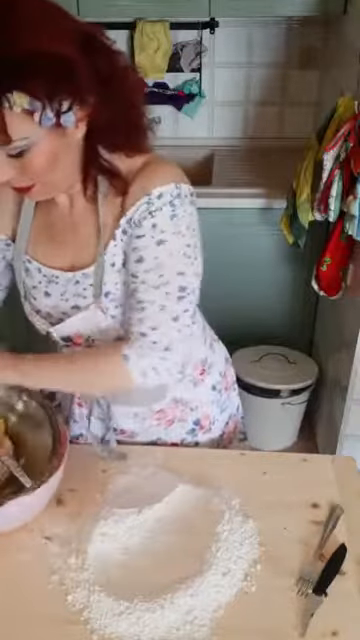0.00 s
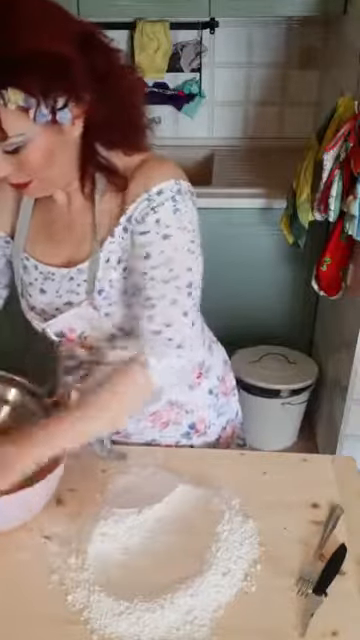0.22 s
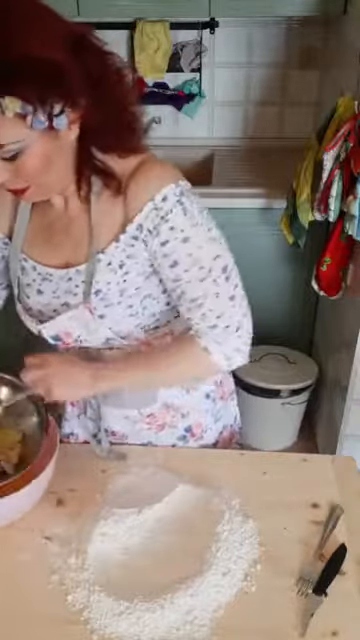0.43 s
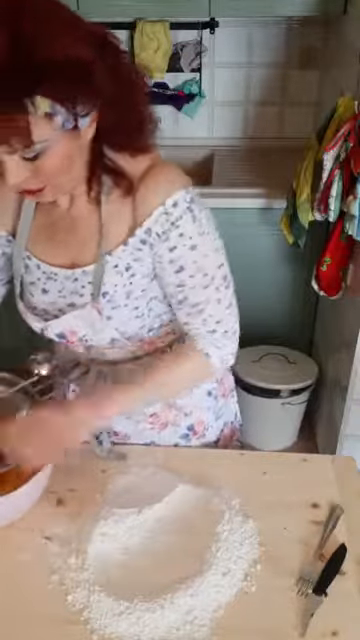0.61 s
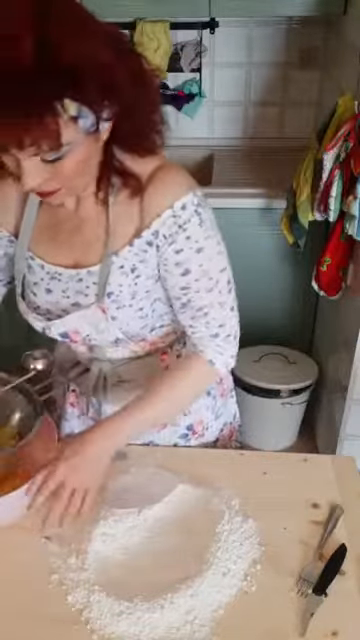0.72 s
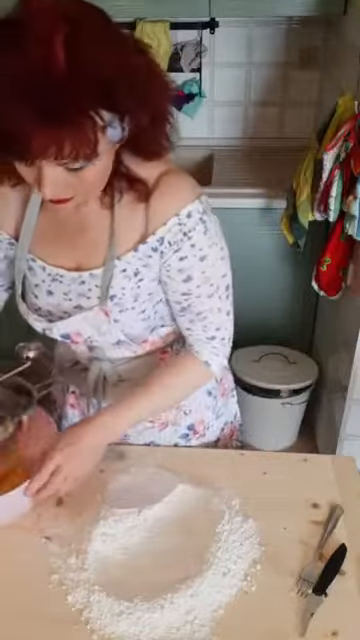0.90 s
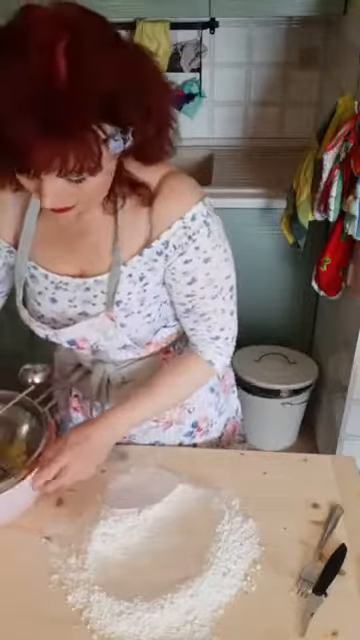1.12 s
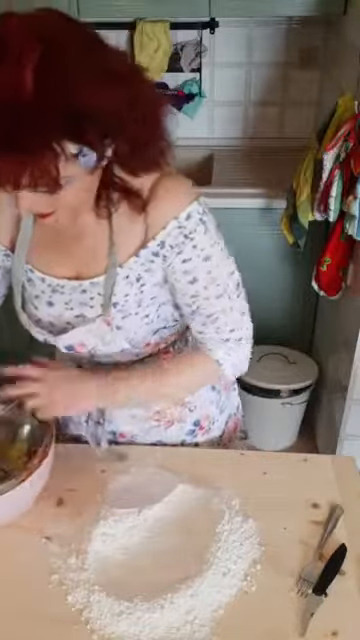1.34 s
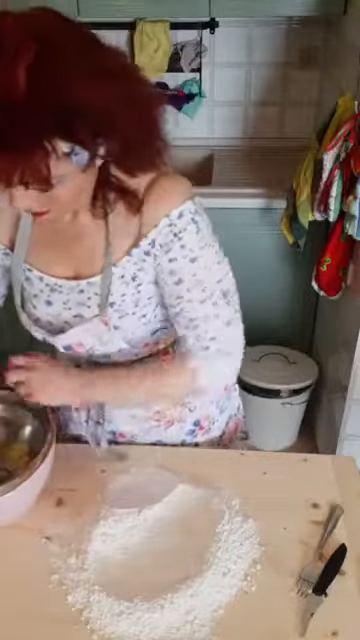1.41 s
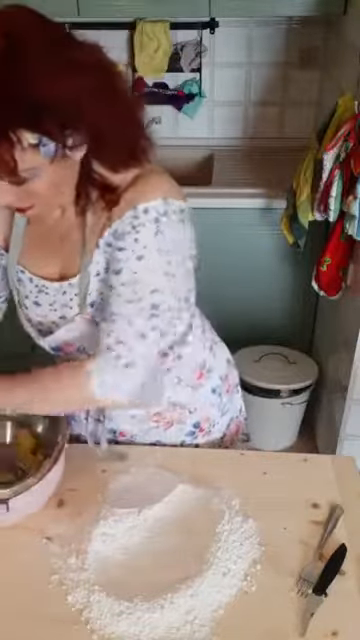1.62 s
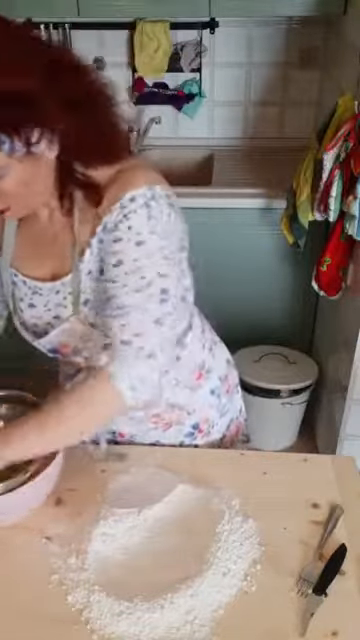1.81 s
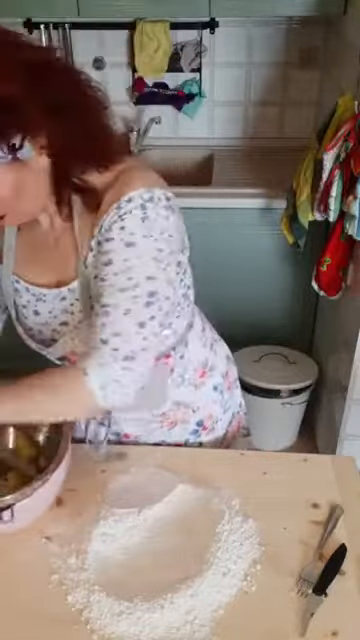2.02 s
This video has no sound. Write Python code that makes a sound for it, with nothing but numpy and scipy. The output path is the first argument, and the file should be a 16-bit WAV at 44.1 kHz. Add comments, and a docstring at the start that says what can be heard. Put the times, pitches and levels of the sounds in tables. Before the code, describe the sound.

Two rough strokes of a metal food mill, first longer with ticks, rasping and a loud hollow bowl knock, then a clattering knock and a brief scrape, heard close, slightly to the right, with short kitchen reverberation.

```python
"""A steel hand mill in a mixing bowl on a wooden board drags and scrapes through two rough strokes.
Tiny slips rub the modes of bowl, steel and table; knocks and ticks strike them; the bare contact hisses.
A tiled kitchen rings on in sparse decaying echoes. The mill stands to one side of a phone with two ports,
whose body shades the far one. Beneath lie a low sway of the table and the noise of room and microphone."""
import sys
import numpy as np
from scipy import signal
from scipy.fft import rfft, irfft, next_fast_len
from scipy.io import wavfile
from scipy.ndimage import uniform_filter1d

SR = 44100
rng = np.random.default_rng(int(sys.argv[2]) if len(sys.argv) > 2 else 0)


def unload_wav(signal):
    """Save mono or channel-first audio to the path in sys.argv[1] as 16-bit WAV at rate SR, clipped to [-1, 1]."""
    wavfile.write(
        sys.argv[1],
        SR,
        np.round(np.clip(np.atleast_2d(signal).T, -1, 1) * 32767).astype(np.int16),
    )


def convert_level_to_amplitude(level_db):
    """Map a level in decibels to its linear amplitude factor."""
    exponent = np.asarray(level_db, float) / 20
    return 10 ** exponent


N = 92610


def evened(x):
    """Normalisation: scales a signal to an rms of one."""
    return x / np.sqrt(np.mean(x ** 2) + 1e-20)


def read(points, hz):
    """Interpolation of a spectral curve along a logarithmic frequency axis."""
    f, value = np.transpose(points)
    return np.interp(np.log(hz + 1), np.log(f + 1), value)


def shaped(x, gain):
    """Linear filtering: multiplies the spectrum by gain(Hz)."""
    size = next_fast_len(N + 4096)
    hz = np.arange(size // 2 + 1) * SR / size
    return irfft(rfft(x, size) * gain(hz), size)[..., :N]


def taps(rows, order):
    """Impulsive excitation: one impulse for each row, as strong as column `order` says in dB."""
    out, rows = np.zeros(N), np.array(rows)
    at = np.round(rows[:, 0] * SR).astype(int)
    np.add.at(out, at, convert_level_to_amplitude(rows[:, order]))
    return out


# Likeness of the two ports. Each row: frequency in Hz, left-right correlation from -1 to 1.
LIKENESS = [(60, 1), (250, 0.79), (500, 0.73), (1000, 0), (2000, 0), (8000, 0)]


def pair(a, b):
    """Partial coherence: a common and an opposed part set the likeness of two ports at each frequency."""
    same = lambda hz: np.clip(read(LIKENESS, hz), -1, 1)
    mid = shaped(a, lambda hz: np.sqrt((1 + same(hz)) / 2))
    side = shaped(b, lambda hz: np.sqrt((1 - same(hz)) / 2))
    return np.array([mid + side, mid - side])


# Colour of the background noise. Each row: frequency in Hz, relative density in dB per Hz.
AIR_COLOUR = [(15, -31), (25, 2.5), (277, -5.5), (363, -9.5), (516, -6), (886, -8), (1400, 0), (2680, -13),
              (5000, -11), (7490, -25), (16000, -17)]
AIR_DB = -63.5  # rms


def air():
    """Stationary noise: the quiet of the room and the microphone's own hiss as coloured Gaussian noise."""
    noise = shaped(rng.standard_normal((2, N)), lambda hz: convert_level_to_amplitude(read(AIR_COLOUR, hz)))
    return convert_level_to_amplitude(AIR_DB) * evened(pair(*noise))


SWAY_HZ, SWAY_RISE_S, SWAY_T60_S = 40, 0.019, 0.31
# Shoves that set the table swaying on its legs. Each row: start in seconds, peak level in dB.
SWAYS = [(.29, -54), (.40, -58), (.47, -55), (.60, -43), (.66, -43), (1.2, -57), (1.33, -51), (1.73, -56),
         (1.9, -56)]


def sway():
    """Damped oscillation: a low swing builds up and decays after each shove."""
    t = np.arange(SR // 2) / SR
    envelope = (1 - np.exp(-t / SWAY_RISE_S)) * convert_level_to_amplitude(-60 * t / SWAY_T60_S)
    swing = envelope * np.sin(2 * np.pi * SWAY_HZ * t)
    return signal.oaconvolve(taps(SWAYS, order=1), swing / abs(swing).max())[:N]


FIRST_ECHO_S, ECHO_STEP = .008, 12  # the step in samples
# Reverberation of the room. Each row: frequency in Hz, time to fall by 60 dB in seconds.
ROOM_DECAY = [(100, 0.53), (260, 0.25), (700, 0.52), (1840, 0.42), (4850, 0.52), (12800, 0.31)]


def kitchen(x):
    """Reverberation: sparse echoes of random sign, each band dying at its own speed."""
    echoes, first = np.zeros((2, SR)), round(FIRST_ECHO_S * SR)
    at = np.arange(first, SR - 20, ECHO_STEP)
    at = at + rng.integers(0, ECHO_STEP, (2, len(at)))
    np.put_along_axis(echoes, at, rng.choice([-1., 1.], at.shape), 1)
    hz, t, bands = signal.stft(echoes, SR, nperseg=256)
    decay = convert_level_to_amplitude(-60 * t / read(ROOM_DECAY, hz)[:, None])
    tail = signal.istft(bands * decay, SR, nperseg=256)[1]
    tail[:, :first] = 0
    tail = tail / np.linalg.norm(tail[0])
    return pair(*signal.fftconvolve(x[None], tail, axes=1)[:, :N])


NEAR_S, NEAR_FROM_HZ = .016, 2000


def near(x):
    """Early scattering: board, wall and bowl rim return the treble soon, differently to each port."""
    echoes = np.zeros((2, SR // 10))
    when, sign = rng.random((2, 2, 64))
    at = 10 + (when ** 2 * NEAR_S * SR).astype(int)  # denser toward the start
    np.put_along_axis(echoes, at, np.sign(sign - .5) / 8, 1)
    scattered = signal.oaconvolve(x[None], echoes, axes=1)[:, :N]
    return shaped(scattered, lambda hz: hz ** 2 / (hz ** 2 + NEAR_FROM_HZ ** 2))


ROOM_DB, NEAR_DB = -1, 4.5
SHIFT_S = 0.4487  # the mill shifts its place this slowly


def reflections(dry):
    """Moving source: the sound glides among three places, each with echoes of its own."""
    turn = np.pi * np.arange(N) / SR / SHIFT_S
    # the squares of the three weights always add up to one
    places = [dry * np.sqrt(2 / 3) * np.cos(turn + k * np.pi / 3) for k in range(3)]
    return sum(convert_level_to_amplitude(ROOM_DB) * kitchen(x) + convert_level_to_amplitude(NEAR_DB) * near(x) for x in places)


LEFT_LAG_S = .0001
SHADE_HZ = 1590  # above this the far port hears the mill chiefly by reflection
# The mill's side. Each row: frequency in Hz, left minus right in dB.
TILT = [(60, 2.5), (110, -2), (200, 0), (380, -0.5), (700, 0.5), (1290, 1), (2380, 1), (4400, 0.5),
        (8120, -10.5), (15000, -8)]


def at_ports(dry):
    """Diffraction: direct sound reaches the far left port late and dulled; both ports add reflections."""
    shade = lambda hz: np.exp(-2j * np.pi * hz * LEFT_LAG_S) / (1 + (hz / SHADE_HZ) ** 2)
    wet = reflections(dry)
    left = shaped(dry, shade) + wet[0]
    right = dry + wet[1]
    return np.array([shaped(left, lambda hz: convert_level_to_amplitude(read(TILT, hz) / 2)),
                     shaped(right, lambda hz: convert_level_to_amplitude(-read(TILT, hz) / 2))])


# The strokes, a list of rows for each. Each row: time in seconds, drive of the bowl in dB,
# drive of the steel in dB, hiss of the contact in dB, rumble of the table in dB.
STROKES = [
    [(0, -42.5, -42.5, -53, -78), (.08, -56.5, -82, -48.5, -61.5), (.15, -38.5, -45, -43.5, -86),
     (.21, -39, -54, -39, -84), (.27, -31.5, -39, -38, -45), (.34, -35, -40.5, -30, -78),
     (.385, -28.5, -31, -50, -56), (.42, -26, -44, -57, -61), (.49, -38.5, -78.5, -42, -74.5),
     (.56, -47, -47, -60, -57), (.61, -32.5, -53, -52, -49), (.645, -39.5, -63, -48.5, -55),
     (.7, -63, -75, -62, -74), (.8, -93, -100, -87, -73)],
    [(1.2, -21, -28.5, -39.5, -50), (1.24, -29.5, -44.5, -38, -58), (1.29, -31, -45, -65, -54),
     (1.36, -52.5, -60, -54.5, -57), (1.44, -45.5, -74, -77, -89), (1.48, -48.5, -63.5, -68, -82),
     (1.56, -53.5, -56, -66, -64), (1.6, -48.5, -50, -56, -60.5), (1.665, -40, -46, -58, -66),
     (1.68, -41.5, -33.5, -38.5, -72), (1.72, -39, -51, -38.5, -84), (1.77, -37, -52.5, -38.5, -77),
     (1.85, -36.5, -59, -49, -57), (1.92, -48.5, -65, -63, -70), (1.97, -57.5, -78, -74, -58),
     (2.03, -54.5, -86.5, -66, -85), (2.1, -66, -74, -65, -83)],
]


def drive(order):
    """Amplitude envelope: gain of one stroke column over time, straight in dB between rows."""
    t, gain = np.arange(N) / SR, 0
    for stroke in STROKES:
        rows = np.array(stroke)
        gain = gain + convert_level_to_amplitude(np.interp(t, rows[:, 0], rows[:, order], left=-120, right=-120))
    return gain


GRAINS_PER_S, GRAIN_SPREAD_DB, CLUMP_DB, CLUMP_S = 2500, 5, 2, 0.0053


def grit():
    """Stick-slip friction: dense tiny slips of uneven size that come in clumps, at an rms of one."""
    clumps = evened(uniform_filter1d(rng.standard_normal(N), round(CLUMP_S * SR)))
    size = convert_level_to_amplitude(GRAIN_SPREAD_DB * np.minimum(rng.exponential(1, N), 4) + CLUMP_DB * clumps)
    slips = rng.random(N) < GRAINS_PER_S / SR
    return evened(size * rng.choice([-1., 1.], N) * slips)


def ringing(modes):
    """Modal impulse response: decaying sines; a body radiates little below its lowest mode."""
    t = np.arange(SR // 3) / SR
    ring = sum(convert_level_to_amplitude(db - 60 * t / t60) * np.sin(2 * np.pi * hz * t) for hz, db, t60 in modes)
    return signal.sosfilt(signal.butter(4, .85 * modes[0][0], "high", fs=SR, output="sos"), ring)


SPOTS = 5
SPOT_DETUNE, SPOT_DB = 0.029, 2.5  # each spot shifts and weighs the modes by up to this
RUB_DAMPING = 0.61  # rubbing shortens the decay times by this factor


def rubbed(modes, slips):
    """Position-dependent excitation: every slip lands on one of a few spots with modes of its own."""
    spot = rng.integers(0, SPOTS, N)
    draw = rng.uniform(-0.81, 1, (SPOTS, len(modes), 2))
    out = np.zeros(N)
    for k in range(SPOTS):
        ring = ringing([(hz * (1 + SPOT_DETUNE * a), db + SPOT_DB * b, t60 * RUB_DAMPING)
                        for (hz, db, t60), (a, b) in zip(modes, draw[k])])
        out += signal.oaconvolve(slips * (spot == k), ring / np.linalg.norm(ring))[:N]
    return out


def body(modes, slips, blows):
    """Superposition: a body rubbed by slips (rms level) and struck by blows (peak level)."""
    ring = ringing(modes)
    return rubbed(modes, slips) + signal.oaconvolve(blows / abs(ring).max(), ring)[:N]


TABLE_KNOCK_DB = -31.5  # below the belly of the bowl
# Modes of the table. Each row: frequency in Hz, relative level in dB, struck 60 dB decay in seconds.
TABLE = [(61.6, -10, 0.19), (81.6, -6, 0.11), (100, 8, 0.14), (114, 7.5, 0.2875), (158, 0, 0.076)]
# Knocks of the bowl on the board. Each row: start in seconds, peak of the belly in dB, peak of the rim in dB,
# peak of the steel in dB, strength of the snap in dB.
KNOCKS = [(0.399, -17, -22, -30, -39), (0.4013, -8, -7, -30, -33), (.410, -21.5, -24, -40, -44.5),
          (.416, -15.5, -28, -17, -42), (.423, -15.5, -32, -33, -42), (.454, -22.5, -35, -45, -48.5),
          (.607, -25, -55, -49, -58), (1.195, -29, -26, -40, -15), (1.199, -23, -29.5, -42, -32),
          (1.208, -17, -15.5, -26.5, -30), (1.211, -14.5, -42, -44, -33), (1.217, -15, -14, -42, -37),
          (1.230, -14.5, -15, -49, -46), (1.484, -48, -33.5, -47, -58), (1.498, -62, -41, -57, -55),
          (1.737, -25, -27, -51, -43), (1.763, -20, -41, -45, -51), (1.79, -27, -50, -43, -52),
          (1.84, -25, -32, -58, -52), (1.859, -30.5, -44, -51, -48)]


def table():
    """Structure-borne sound: strokes and knocks pass into the modes of the table."""
    return body(TABLE, drive(order=4) * grit(), convert_level_to_amplitude(TABLE_KNOCK_DB) * taps(KNOCKS, order=1))


BITE_S = .0015  # time constant of the onset


def puffs(blows, length_s, gain):
    """Transient noise: short bursts of one colour with exponential rise and decay."""
    t = np.arange(2000) / SR
    burst = (1 - np.exp(-t / BITE_S)) * np.exp(-t / length_s)
    envelope = signal.oaconvolve(blows, burst)[:N]
    return shaped(envelope * rng.standard_normal(N), gain)


SNAP_S, SIZZLE_S, SIZZLE_HZ = 0.0015, 0.0027, (10500, 15360)  # decay constants; edges of the sizzle
# Colour of the bare contact. Each row: frequency in Hz, relative density in dB per Hz.
CONTACT_COLOUR = [(530, -21.5), (900, 2.5), (979, -8), (2040, -4.5), (2440, -3), (7850, -22.5),
                  (9750, -30.5), (14500, -24.5), (16000, -39.5)]
# Ticks of steel on steel. Each row: start in seconds, peak of the steel in dB, strength of the snap in dB,
# strength of the sizzle in dB, peak of belly and of rim in dB, brightest frequency in Hz.
TICKS = [(.064, -34, -29, -55, -37.5, 2600), (.092, -27, -41, -55, -38, 2600),
         (.0955, -18.5, -21, -50, -31, 2750), (.128, -32, -38, -54, -34.5, 2090),
         (0.156, -45, -46, -42, -43, 2300), (.224, -28, -45, -25.5, -41, 2950),
         (0.2303, -19, -17.5, -37, -25, 2700), (0.2753, -22, -12, -29, -24, 2100),
         (.329, -21, -11, -28, -38, 3170), (.504, -25, -24.5, -35, -49, 2160),
         (.623, -22.5, -40, -60, -28.5, 2450), (.638, -30.5, -46, -61, -33.5, 2450),
         (1.581, -31, -55, -44, -70, 3060), (1.670, -23.5, -30, -34, -45, 3080),
         (1.674, -13.5, -29, -41, -31, 3080), (1.682, -26, -16, -48, -47, 2300),
         (1.691, -30, -44, -52, -52, 2800), (1.721, -25, -41, -52, -37, 2720)]


def contact():
    """Contact noise: rubbing surfaces hiss in strokes, snap at knocks and ticks, and sizzle at ticks."""
    unit = np.sqrt(np.mean(convert_level_to_amplitude(2 * read(CONTACT_COLOUR, np.linspace(0, SR / 2, 999)))))
    colour = lambda hz: convert_level_to_amplitude(read(CONTACT_COLOUR, hz)) / unit
    low, high = SIZZLE_HZ
    top = lambda hz: 1 / (1 + (low / (hz + 1)) ** 10) / (1 + (hz / high) ** 20)
    hiss = shaped(drive(order=3) * evened(grit() + rng.standard_normal(N)), colour)
    snap = puffs(taps(KNOCKS, order=4) + taps(TICKS, order=2), SNAP_S, colour)
    sizzle = puffs(taps(TICKS, order=3), SIZZLE_S, top)
    return hiss + snap + sizzle


TICK_OCTAVES = 0.36  # modes this far from the brightest pitch are 6 dB weaker
KNOCK_HZ, TICK_RISE_S = 2300, 0.0004  # brightest pitch of the steel in a knock; time constant of the onset
# Modes of the steel parts. Each row: frequency in Hz, relative level in dB, struck 60 dB decay in seconds.
STEEL = [(1817, -8, 0.013), (2054, 0, 0.026), (2213, 6.5, 0.018), (2450, 0.5, .025), (2613, 2, 0.024),
         (2790, -4.5, 0.015), (2995, -0.5, 0.018), (3148, -3.5, 0.03), (3410, -8.5, 0.015),
         (3736, -3, 0.011), (4165, -3, 0.022), (4600, -4.5, 0.0076), (4820, -3, 0.018), (5340, -18.5, 0.02),
         (6800, -29, 0.0068), (8200, -27.5, 0.012)]


def struck_steel():
    """Selective modal excitation: each blow rings chiefly the modes near its brightest pitch."""
    out = np.zeros(N + SR)
    blows = [(r[0], r[1], r[5]) for r in TICKS] + [(r[0], r[3], KNOCK_HZ) for r in KNOCKS]
    for s, peak_db, top_hz in blows:
        ring = ringing([(hz, db - 6 * (np.log2(hz / top_hz) / TICK_OCTAVES) ** 2, t60)
                        for hz, db, t60 in STEEL])
        ring *= 1 - np.exp(-np.arange(len(ring)) / SR / TICK_RISE_S)
        out[round(s * SR):][:len(ring)] += convert_level_to_amplitude(peak_db) * ring / abs(ring).max()
    return out[:N]


def steel():
    """Modal vibration: the steel parts ring from the slips of the strokes and from ticks and knocks."""
    return rubbed(STEEL, drive(order=2) * grit()) + struck_steel()


RIM_DRAG_DB = -7.5  # drag of the rim below that of the belly
# Modes of the bowl's belly, then of its rim.
# Each row: frequency in Hz, relative level in dB, struck 60 dB decay in seconds.
BELLY = [(207.6, -22.5, 0.098), (277, -26.5, 0.034), (307, -22.5, 0.035), (385, -3.5, 0.11),
         (413.3, -6.5, 0.12), (458, 7, 0.078), (504.5, 10, 0.079), (551, 0, 0.1), (597, 3.5, 0.039),
         (699.4, -1.5, 0.075), (767, -11.5, 0.047)]
RIM = [(855, -9.5, .03), (1002, -9.5, 0.028), (1080, -3, 0.027), (1202, 0.5, 0.022), (1405, 7, 0.012),
       (1503, 1, 0.031), (1643, -6.5, 0.0083)]


def bowl():
    """Shell vibration: slips, knocks and ticks ring the low modes of the belly and the higher of the rim."""
    ticks = taps(TICKS, order=4)
    belly = body(BELLY, drive(order=1) * grit(), taps(KNOCKS, order=1) + ticks)
    rim = body(RIM, convert_level_to_amplitude(RIM_DRAG_DB) * drive(order=1) * grit(), taps(KNOCKS, order=2) + ticks)
    return belly + rim


def mill():
    """Coupled radiation: table, bare contact, steel and bowl sound together under the same strokes."""
    return table() + contact() + steel() + bowl()


def scene():
    """Superposition: the mill as it reaches the two ports, over the air and the sway of the table."""
    return air() + sway() + at_ports(mill())


def top_cut(x):
    """Nothing passes above the cut-off."""
    return signal.sosfilt(signal.butter(12, 16120, fs=SR, output="sos"), x)


BASS_CUT_HZ, EDGE_HZ = 30, 16050


def record(dry):
    """Band limitation: the microphone's bass cut and a steep upper edge bound the spectrum."""
    cut = signal.sosfilt(signal.butter(3, BASS_CUT_HZ, "high", fs=SR, output="sos"), dry)
    mix = shaped(cut, lambda hz: np.clip((EDGE_HZ - hz) / 100, 0, 1))
    return top_cut(mix)


dry = scene()
out = record(dry)
unload_wav(out)
```